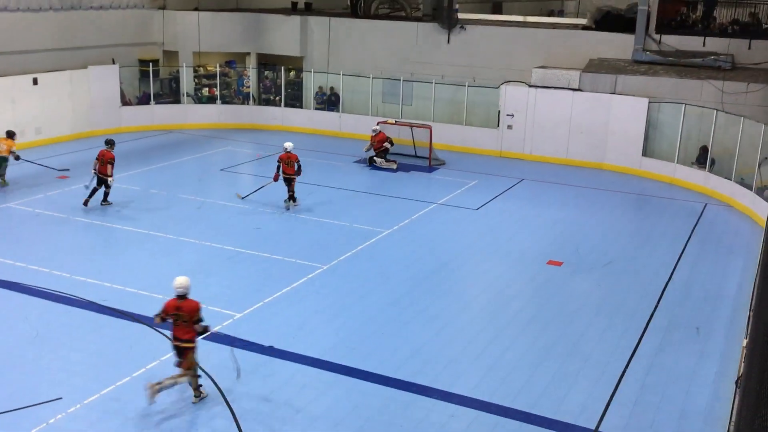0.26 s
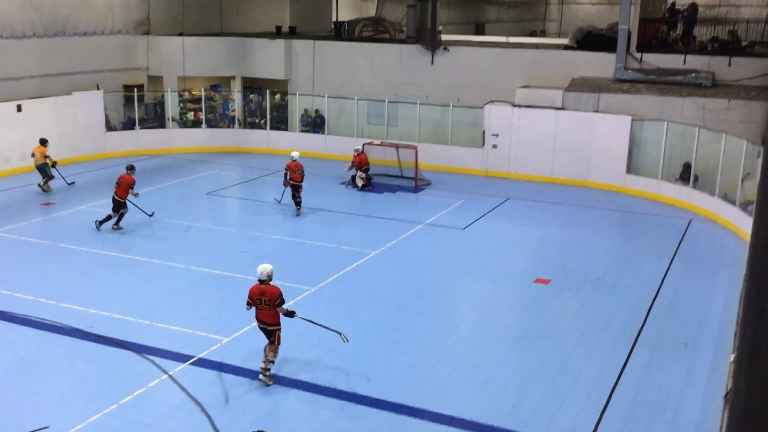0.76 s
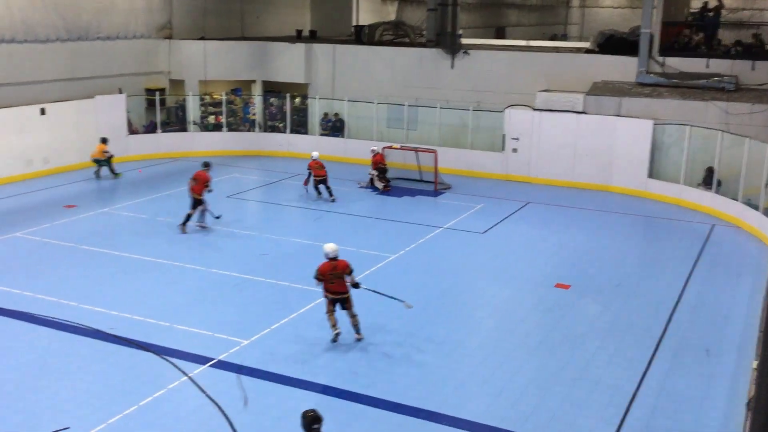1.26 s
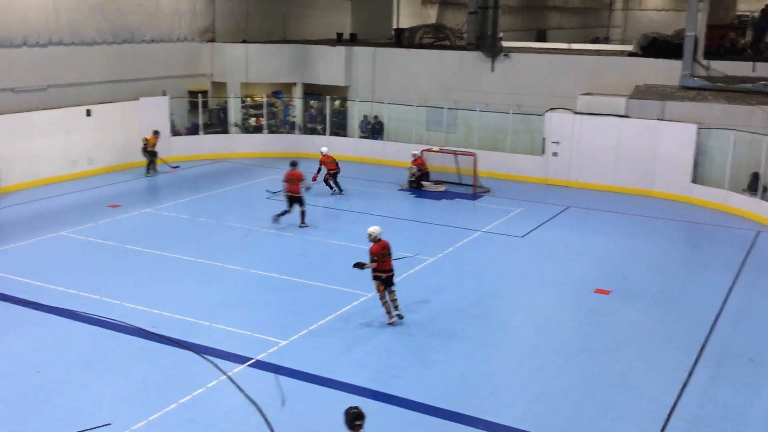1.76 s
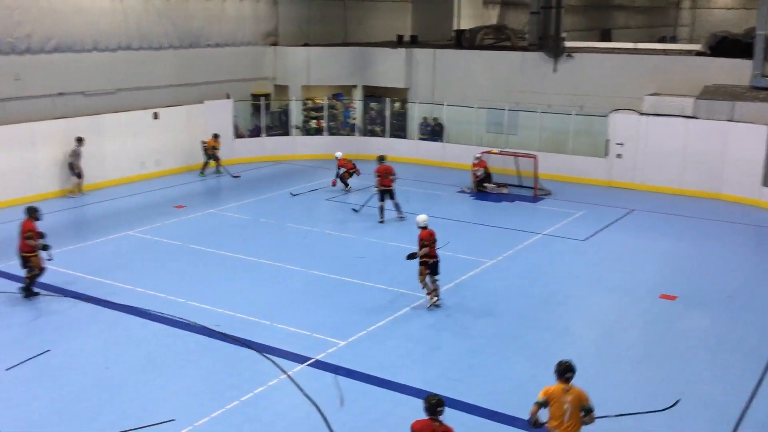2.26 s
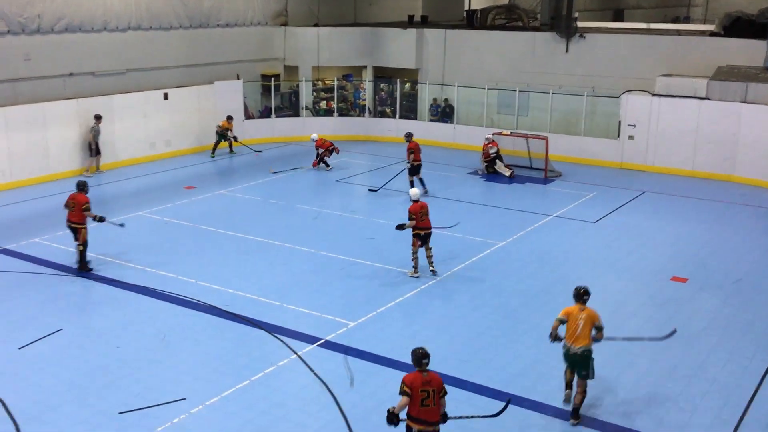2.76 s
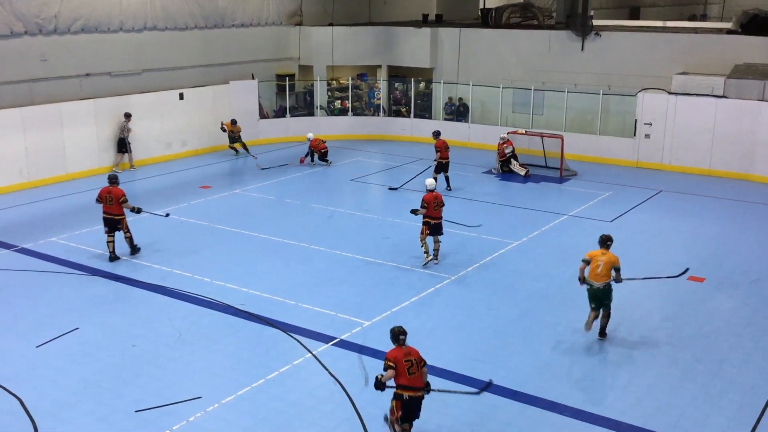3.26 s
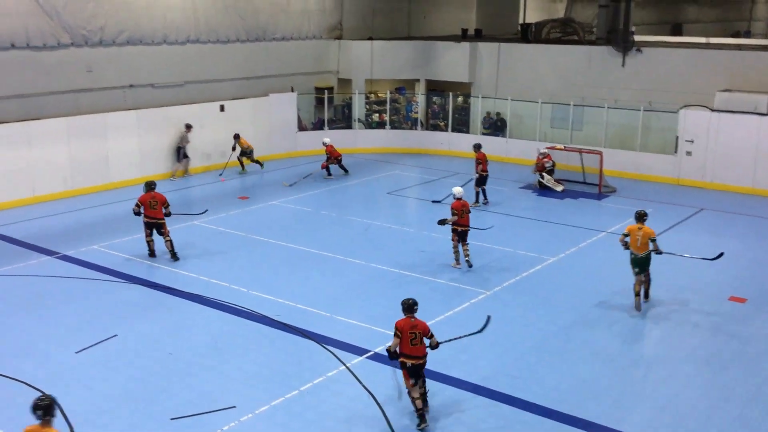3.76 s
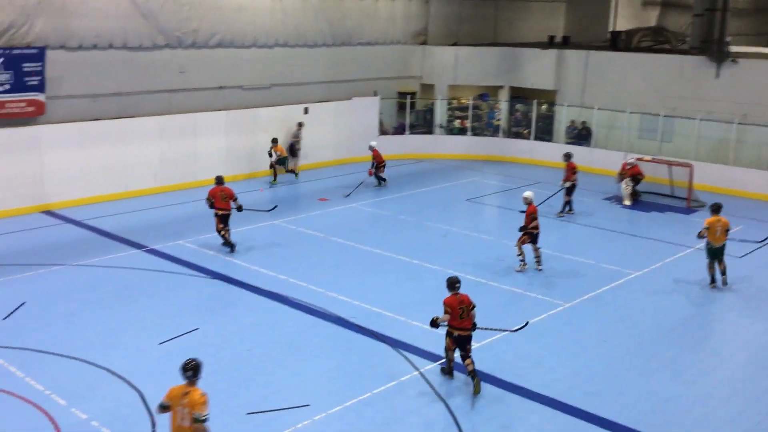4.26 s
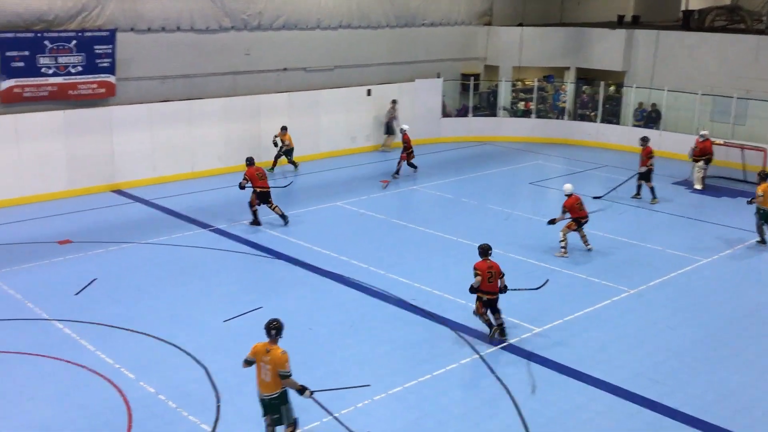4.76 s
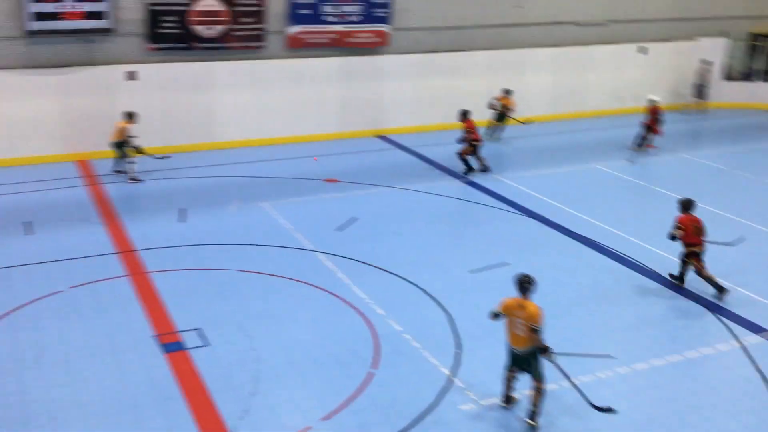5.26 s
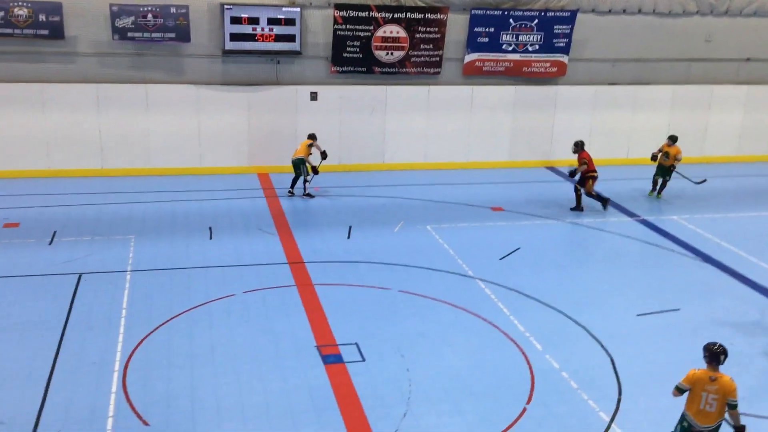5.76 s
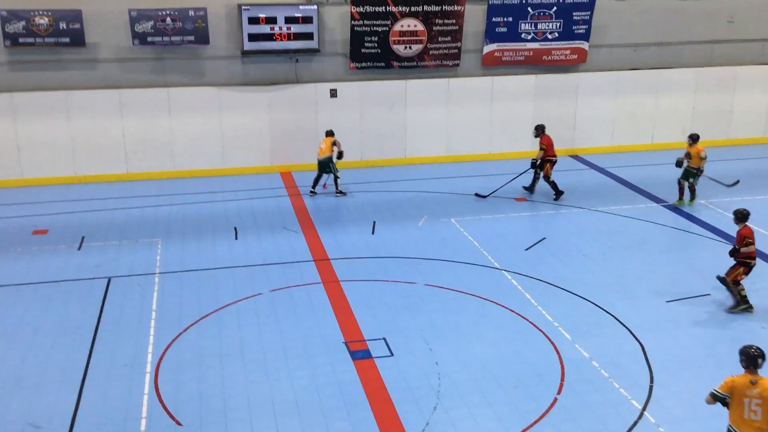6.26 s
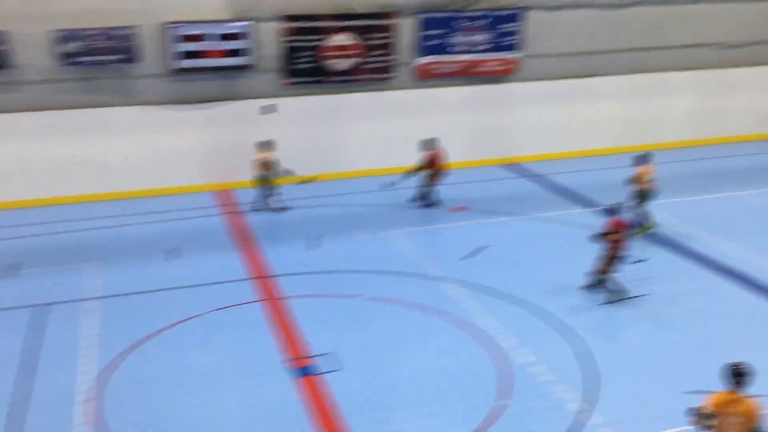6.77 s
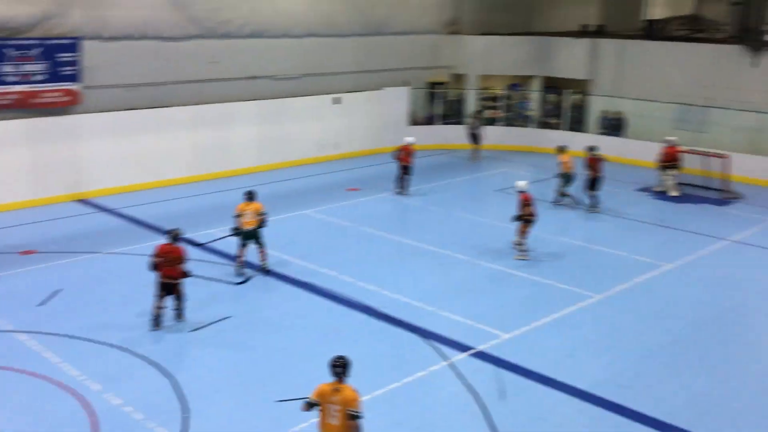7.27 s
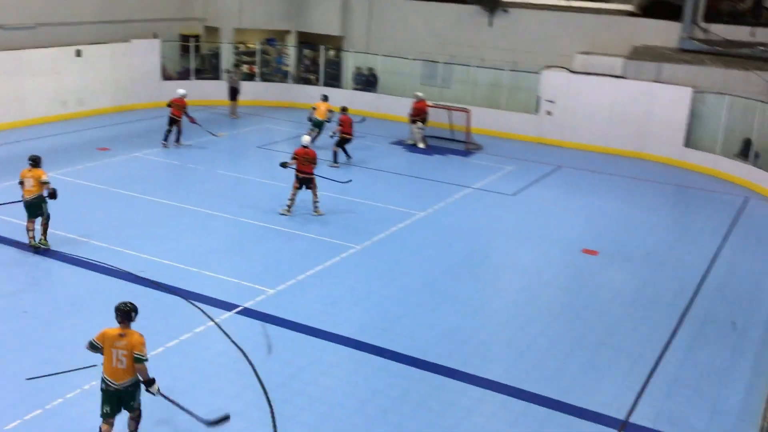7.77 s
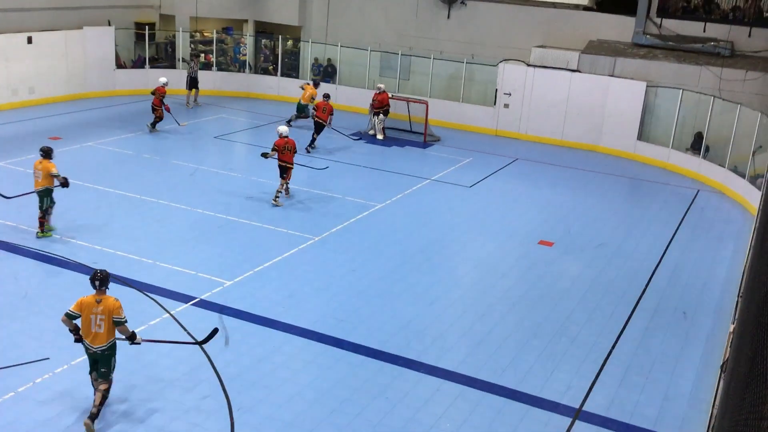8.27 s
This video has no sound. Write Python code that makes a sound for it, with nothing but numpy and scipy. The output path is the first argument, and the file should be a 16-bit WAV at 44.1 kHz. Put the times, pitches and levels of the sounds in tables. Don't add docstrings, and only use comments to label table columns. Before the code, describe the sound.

Close grip thumps and plastic ticks over steady hiss, while a big hard arena faintly returns stick clacks, sole squeaks and a late whistle.

```python
import sys
import numpy as np
from scipy import signal
from scipy.fft import rfft, irfft
from scipy.io import wavfile

SR = 44100
rng = np.random.default_rng(int(sys.argv[2]) if len(sys.argv) > 2 else 0)


def generate_wav(sig):
    pcm = np.round(np.clip(np.atleast_2d(sig).T, -1, 1) * 32767).astype(np.int16)
    wavfile.write(sys.argv[1], SR, pcm)


def magnitude_from_level(level_db):
    exponent = np.asarray(level_db, float) / 20
    return 10 ** exponent


N = 376173

# frequency in Hz, gain in dB.
CASING_HZ_DB = [(20, -60), (30, -33), (45, -12), (60, -2.5), (95, 0), (150, -1.5), (250, -5), (350, -8.5),
                (480, -15), (630, -15.5), (920, -24.5), (1600, -29), (3500, -34.5), (8000, -44.5),
                (14000, -52.5)]
# centre in Hz, Q [no unit].
SPLITTERS_HZ_Q = [(67.2, .57), (686, .6)]
# time in seconds, level in dB.
UNREST_S_DB = [(0, -61), (.4, -63.5), (.55, -59), (.8, -60.5), (1.2, -59.5), (2.0, -63.5), (2.8, -65.5),
               (3.199, -63.5), (4.2, -62.5), (5.0, -59.5), (5.6, -68), (6.1, -63), (6.55, -69), (6.82, -64),
               (6.87, -51.5), (7.58, -58.5), (7.72, -65), (8.53, -67.5)]
# time in seconds, swing in dB.
SWING_S_DB = [(0, -6), (.9, 2), (2.7, -2.5), (3.3, 3), (4.4, 3.5), (5.4, 4.5), (6.5, -3.5), (7.1, 1),
              (8.53, 0)]
# frequency in Hz, density in dB per Hz.
HISS_HZ_DB = [(120, -30), (200, 0), (298, -5), (419, -17), (647, -17.5), (912, -22), (9050, -34),
              (12300, -41), (15000, -61)]
# start in seconds, strength in dB, softness in Hz.
PUSHES = [(.00934, 5.5, 250), (.0776, 23.5, 1000), (.17376, 10, 2000), (.26, 14, 3237), (0.7414, 7, 2400),
          (1.23113, 6.5, 6732), (1.33385, 21, 3500), (2.0939, 7, 3500), (2.4122, 17, 4668), (2.434, 35, 90),
          (2.6613, 32, 519), (2.8331, 20, 35), (3.1227, 26, 2000), (3.23, 21.5, 3500), (5.03338, 16.5, 500),
          (6.4481, 23, 1100), (6.84592, 16, 6732), (6.8945, 5, 40), (6.9016, 27, 40), (6.924, 9, 37),
          (6.9729, 9, 4668), (7.0175, 9.5, 230), (7.077, 17, 360), (7.1147, 16.5, 40), (7.191, 11, 250),
          (7.2013, 13.5, 650), (7.2419, 17.5, 600), (7.31, 28, 14000), (7.3834, 26, 1556),
          (7.6912, 14.5, 3237)]
# start in seconds, strength in dB, softness in Hz.
PULLS = [(.2404, 22.5, 55), (.66558, 12.5, 4000), (0.7256, 10.5, 120), (0.8101, 13.5, 9600),
         (.964, 29.5, 1000), (1.1738, 3, 4668), (1.874, -3.5, 519), (3.905, 12, 40), (5.9324, 19, 9708),
         (6.11, 7.5, 3430), (6.8328, 1, 6660), (6.851, 8.5, 1000), (6.87224, 14, 40), (6.88356, 31.5, 248),
         (6.9096, 28, 245), (6.9385, 19, 40), (6.9653, 19, 58), (6.9701, 16.5, 40), (7.0426, 9.5, 83),
         (7.3949, 11, 40.4), (7.471, 15, 4740), (7.55077, 1, 6800), (7.5598, 16, 40), (7.5647, 12, 40),
         (7.5746, 22.5, 3200), (7.5785, 29.5, 1630), (7.5826, 27, 1079), (7.5891, 24, 1556),
         (7.7348, 3.5, 175), (7.948, 38.5, 39)]
# start in seconds, strength in dB.
TAPS = [(0.203, -6), (0.2998, -11.5), (0.4793, -13), (.6285, -6), (1.52, -10), (1.5345, -13), (1.6507, -6),
        (1.7, -5.5), (1.7698, -10), (1.807, -9.5), (1.9207, -6), (2.3649, -10.5), (2.525, -6),
        (2.595, -7.5), (2.866, -7), (3.0765, -12), (3.4822, -9.5), (5.5867, -14.5), (6.402, -11),
        (6.6555, -7.5), (6.722, -16), (6.8603, 0), (6.9048, 0.5), (6.9312, 3), (6.955, -7), (6.989, 1),
        (7.4317, -4), (7.5246, -7), (7.838, -12.5), (8.231, -7)]
# start in seconds, strength in dB.
TICKS = [(0.3559, -10), (.5143, -8.5), (0.523, -3), (.767, -8), (0.792, -8.5), (1.15692, -6), (1.2008, -8),
         (1.257, -8), (1.4155, -1.5), (1.455, -9), (1.6369, -7.5), (1.74612, -7.5), (2.0432, -6.5),
         (2.1979, -8), (3.6525, -6), (3.6606, -3.5), (3.7899, -5.5), (3.9504, -5), (4.1664, -12),
         (4.8453, -15), (4.8481, -1.5), (4.91, -9.5), (5.232, -10), (5.3439, -2.5), (6.2199, -9.5),
         (6.2932, -5), (6.7937, -10), (7.0703, -20.5), (7.1864, -0.5), (7.6645, -9.5)]
# start in seconds, strength in dB.
FLICKS = [(0.4193, -14.5), (0.5595, -9.5), (0.6673, 1), (0.7037, -14), (1.13, -14), (1.3073, -11.5),
          (2.931, -10.5), (3.2613, -10.5), (3.498, -14), (3.529, -15), (4.104, -14.5), (4.191, -14.5),
          (4.5299, -11.5), (4.564, -13), (4.746, -15.5), (4.9574, -7.5), (5.1159, -10.5), (5.461, -13),
          (5.679, -15), (5.7252, -16.5), (5.8013, -13), (6.0538, -17), (6.3564, -14), (6.7434, -12),
          (6.8395, -8), (7.0112, -10), (7.1694, -12), (7.296, -9), (7.8795, -14.5), (8.343, -14)]
# start in seconds, strength in dB, softness in Hz, direction [+-1].
BUMPS = [(0.5337, 12, 80, -1), (0.964, 13, 101, -1), (1.4971, 8.5, 605, 1), (1.7091, 18.5, 79.4, 1),
         (2.4574, 8, 300, -1), (2.6592, 24, 45, 1), (2.8862, -3.5, 1900, 1), (3.893, 10, 55, -1),
         (3.895, 14, 218, -1), (3.9021, 15, 450, -1), (4.284, 3, 438, -1), (4.4163, 4.5, 383, 1),
         (4.6959, 1, 1400, 1), (4.8, 11.5, 373, -1), (4.9395, 16, 79.5, 1), (4.954, 15.5, 80, -1),
         (5.0889, 12.5, 200, -1), (5.0932, 26, 55.4, -1), (6.8421, 34.5, 37.6, 1), (6.8865, 36, 32, 1),
         (6.9158, 20, 220, -1), (6.9336, 8, 139, -1), (6.984, 9, 105, 1), (6.9939, 9, 218, -1),
         (6.998, 27.5, 56, -1), (7.00333, 8, 200, -1), (7.111, 1, 1600, 1), (7.1271, -1, 1800, 1),
         (7.142, 7, 208, 1), (7.5682, 1, 1900, 1)]
# start in seconds, strength in dB.
SHOVES = [(2.4338, 46), (2.8353, 43.5), (3.5013, 29.5), (4.0491, 38.5), (4.5049, 30), (4.834, 40.5),
          (4.8974, 41), (4.9263, 36), (6.6669, 35), (6.7044, 32), (6.747, 36.5), (6.962, 38), (7.1318, 35),
          (7.146, 34), (7.174, 38.5), (7.1992, 34), (7.2363, 33), (7.343, 28.5), (7.44, 26), (7.5514, 37),
          (7.5837, 39.5), (7.608, 27), (7.6421, 31), (7.6887, 35)]
# start in seconds, strength in dB.
TUGS = [(1.0454, 33.6), (1.9375, 33.2), (2.526, 30), (2.857, 34), (3.2149, 30), (3.261, 31), (3.603, 40),
        (3.9092, 41.5), (3.9258, 32.7), (4.2903, 39.8), (4.796, 39), (4.8076, 45.5), (4.9814, 32),
        (5.283, 34.3), (5.495, 33.8), (5.5918, 32.7), (6.7257, 40), (6.907, 43.5), (6.948, 30.8),
        (7.0197, 39), (7.044, 35), (7.0643, 37.8), (7.0806, 38.5), (7.412, 37.2), (7.4642, 33),
        (7.497, 35.3), (7.529, 46.4), (7.949, 44.4), (8.223, 37), (8.4192, 33.3)]
# start in seconds, length in seconds, level in dB, pitch in Hz, width in Hz.
TONES = [
    (.45, .25, -88, 1510, 60),
    (.72, 0.21, -88, 1500, 60),
    (1.8, 0.2, -90, 2520, 151),
    (2.747, 0.45, -89, 2270, 100),
    (4.25, 0.16, -89, 2240, 79.5),
    (5.4, 0.43, -93, 1515, 68.4),
    (7.6, 0.67, -89.5, 2505, 90),
    (7.599, 0.8, -88.5, 2630, 90),
]
# start in seconds, level in dB, mode in Hz, width in Hz.
CLACKS = [
    (1.378, -74, 1550, 700),
    (1.46, -87, 1700, 400),
    (2.637, -75, 1500, 500),
    (2.636, -77, 2300, 300),
    (2.637, -75, 3600, 1100),
    (2.9, -80, 3800, 900),
    (4.004, -79.5, 3470, 2500),
]


def evened(x):
    return x / np.sqrt(np.mean(x ** 2) + 1e-20)


def read(points, hz):
    f, value = np.transpose(points)
    return np.interp(np.log(hz + 1), np.log(f + 1), value)


def over_time(points):
    return np.interp(np.arange(N) / SR, *np.transpose(points))


def add(mix, start_s, sound):
    part = mix[round(start_s * SR):][:len(sound)]
    part += sound[:len(part)]


def band(x, hz, width_hz):
    return signal.lfilter(*signal.iirpeak(hz, hz / width_hz, SR), x)


def casing():
    size = 8192
    hz = np.fft.rfftfreq(size, 1 / SR)
    colour = [(1, -110), *CASING_HZ_DB, (16000, -85), (SR / 2, -95)]
    cepstrum = irfft(np.log(magnitude_from_level(read(colour, hz))))
    cepstrum[1:size // 2] *= 2
    cepstrum[size // 2 + 1:] = 0
    response = np.exp(rfft(cepstrum))
    for centre_hz, q in SPLITTERS_HZ_Q:
        s = 1j * hz / centre_hz
        response *= (s * s - s / q + 1) / (s * s + s / q + 1)
    return hz, response


def jolt(body, soft_hz, softer_hz):
    hz, response = body
    return irfft(response / (1 + 1j * hz / soft_hz) / (1 + 1j * hz / softer_hz))


def strike(rows, sound):
    out = np.zeros(N)
    for start_s, strength_db in rows:
        add(out, start_s, magnitude_from_level(strength_db) * sound)
    return out


def tremors(per_s, spread_db, soft_hz, softer_hz):
    chance = rng.random(N)
    size = np.minimum(rng.exponential(1, N), 4)
    sign = rng.choice([-1., 1.], N)
    train = sign * magnitude_from_level(spread_db * size) * (chance < per_s / SR)
    return evened(signal.oaconvolve(train, jolt(casing(), soft_hz, softer_hz))[:N])


def grip():
    unrest_db = over_time(UNREST_S_DB) + 65
    swing_db = over_time(SWING_S_DB)
    thuds = tremors(per_s=300, spread_db=-0.5, soft_hz=13, softer_hz=25.6)
    thuds = evened(band(thuds, hz=67, width_hz=58))
    rumble = tremors(per_s=370, spread_db=3.5, soft_hz=60, softer_hz=215)
    crackle = tremors(per_s=250, spread_db=5.5, soft_hz=700, softer_hz=1500)
    ticks = tremors(per_s=500, spread_db=3.5, soft_hz=3000, softer_hz=9000)
    out = magnitude_from_level(-59 + 0.3 * unrest_db + swing_db) * thuds
    out += magnitude_from_level(-65.5 + 1.01 * unrest_db) * rumble
    out += magnitude_from_level(-74.5 + 1.15 * unrest_db - 0.3 * swing_db) * crackle
    out += magnitude_from_level(-74.5 + 1.33 * unrest_db) * ticks
    return out


def hiss():
    level_db, low_hz, high_hz = -80.5, 430, 12800
    hz = np.fft.rfftfreq(N, 1 / SR)
    spectrum = rfft(rng.standard_normal(N)) * magnitude_from_level(read(HISS_HZ_DB, hz))
    spectrum *= (hz > low_hz) & (hz < high_hz)
    return magnitude_from_level(level_db) * evened(irfft(spectrum, N))


def knocks():
    out, body = np.zeros(N), casing()
    for gain, rows in ((0.94, PUSHES), (-0.89, PULLS)):
        for start_s, strength_db, soft_hz in rows:
            add(out, start_s, gain * magnitude_from_level(strength_db) * jolt(body, soft_hz, 11700))
    return out


def taps():
    return strike(TAPS, -jolt(casing(), soft_hz=500, softer_hz=1500))


def shell_ticks():
    return strike(TICKS, jolt(casing(), soft_hz=6100, softer_hz=SR / 2))


def flicks():
    return strike(FLICKS, -jolt(casing(), soft_hz=4500, softer_hz=13500))


def bumps():
    out, body = np.zeros(N), casing()
    for start_s, strength_db, soft_hz, way in BUMPS:
        add(out, start_s, np.sign(way) * magnitude_from_level(strength_db) * jolt(body, soft_hz, 0.94 * soft_hz))
    return out


def hand_shifts():
    shift = jolt(casing(), soft_hz=14.7, softer_hz=24.6)
    return strike(SHOVES, shift) - strike(TUGS, shift)


def squeaks_and_whistle():
    flutter_hz, flutter_depth, droop_db = 24, 0.36, -10.5
    out = np.zeros(N)
    for start_s, length_s, level_db, hz, width_hz in TONES:
        t = np.arange(round(length_s * SR)) / SR
        noise = rng.standard_normal(N // 6)
        tone = evened(band(band(noise, hz, width_hz), hz, width_hz))[:len(t)]
        tone *= 1 + flutter_depth * np.sin(2 * np.pi * flutter_hz * t)
        tone *= signal.windows.tukey(len(t), 0.15)
        add(out, start_s, magnitude_from_level(level_db + droop_db * t / length_s) * tone)
    return out


def stick_clacks():
    out = np.zeros(N)
    t = np.arange(600) / SR
    for start_s, level_db, hz, width_hz in CLACKS:
        crack = rng.standard_normal(len(t)) * magnitude_from_level(-60 * t / 0.0027)
        ring = band(band(crack, hz, width_hz), hz, 2 * width_hz)
        add(out, start_s, magnitude_from_level(level_db) * evened(ring))
    return out


def court():
    t60_s, build_s = 2.2, 0.02
    tones, clacks = squeaks_and_whistle(), stick_clacks()
    t = np.arange(SR) / SR
    tail = rng.standard_normal(SR) * magnitude_from_level(-60 * t / t60_s)
    tail *= (1 - np.exp(-t / build_s)) * (1 - t)
    tail /= np.linalg.norm(tail)
    sent = magnitude_from_level(-0.5) * tones + magnitude_from_level(3.5) * clacks
    return tones + clacks + signal.fftconvolve(sent, tail)[:N]


def scene():
    handling = grip() + knocks() + taps() + shell_ticks() + flicks() + bumps() + hand_shifts()
    return (handling + hiss() + court())[None]


def low_pass(x):
    return signal.sosfilt(signal.butter(12, 15700, fs=SR, output="sos"), x)


def record(dry):
    return low_pass(dry)


dry = scene()
out = record(dry)
generate_wav(out)
```